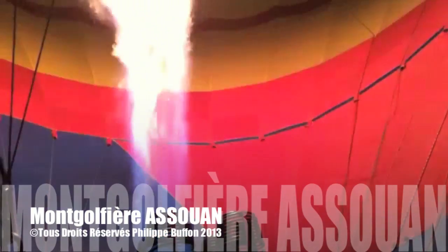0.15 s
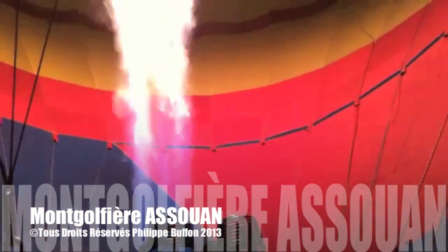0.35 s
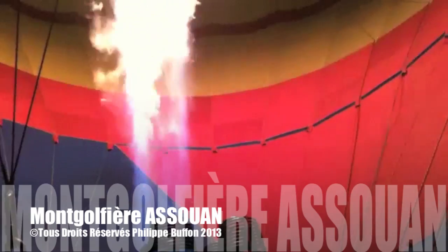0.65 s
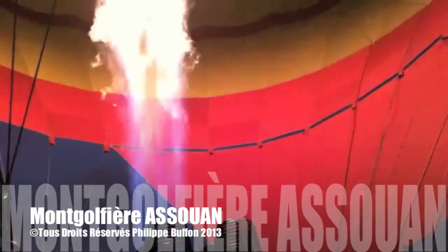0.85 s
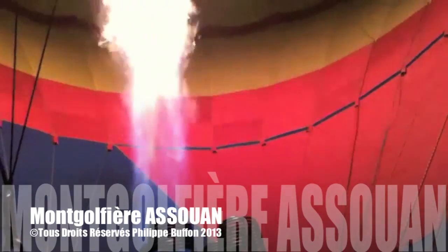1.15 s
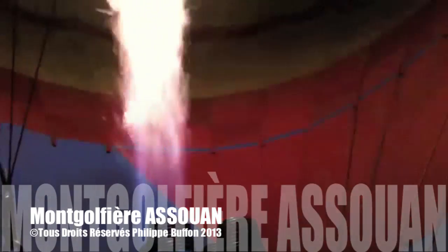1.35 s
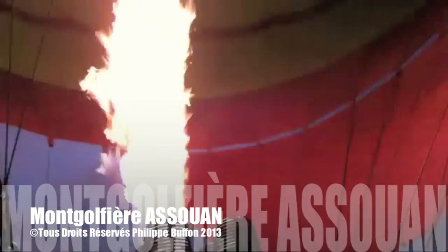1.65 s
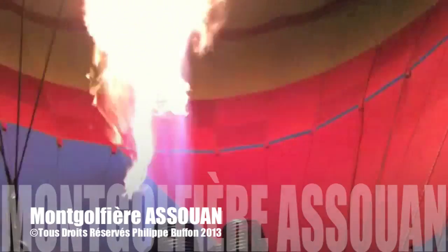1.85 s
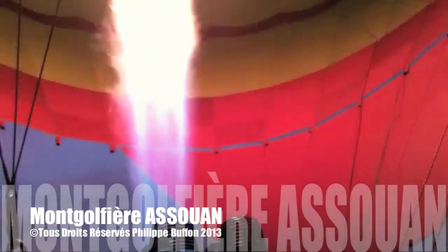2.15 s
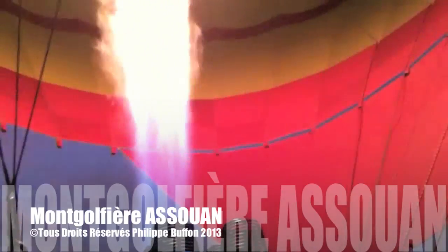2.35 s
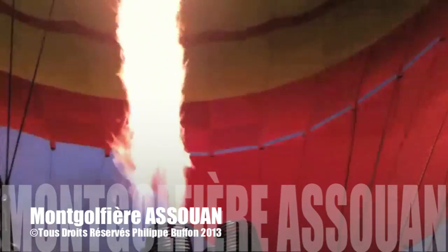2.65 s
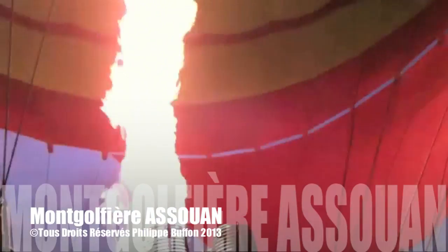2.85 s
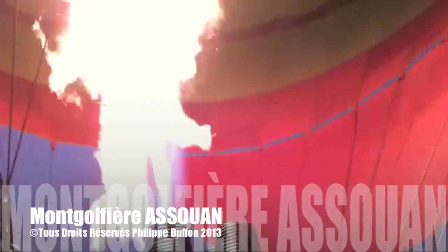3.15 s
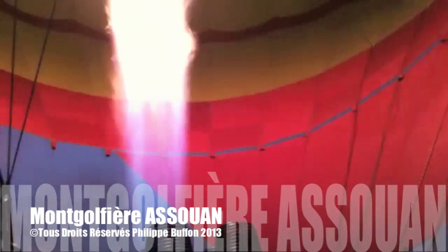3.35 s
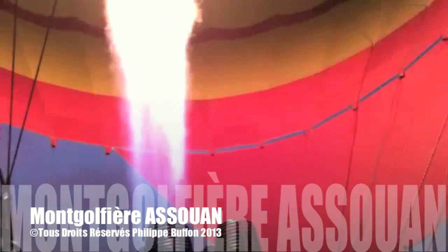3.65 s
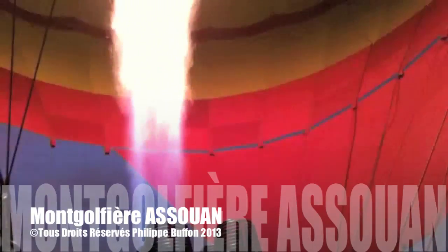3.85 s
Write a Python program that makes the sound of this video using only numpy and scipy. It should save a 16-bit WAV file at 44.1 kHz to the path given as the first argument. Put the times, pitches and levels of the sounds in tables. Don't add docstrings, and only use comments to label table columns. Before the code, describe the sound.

A propane burner roars and hisses loudly in bursts under a balloon envelope, twice dying to a dull faint echo before snapping back on.

```python
import sys
import numpy as np
from scipy import signal
from scipy.fft import rfft, irfft, dct, next_fast_len
from scipy.io import wavfile
from scipy.ndimage import uniform_filter1d

SR = 44100
rng = np.random.default_rng(int(sys.argv[2]) if len(sys.argv) > 2 else 0)


def store_wav(level_fs):
    pcm = np.round(np.clip(np.atleast_2d(level_fs), -1, 1) * 32767)
    wavfile.write(sys.argv[1], SR, pcm.T.astype(np.int16))


def nominal_scale(level):
    x = np.asarray(level, float) / 20
    return 10 ** x


N = 177326
FRAME = 1024

# time_s, level_db
VALVE_FLOW = [(0, -21.5), (.05, -21), (.9, -20.5), (1.2, -24), (1.32, -30), (1.45, -41), (1.708, -56),
              (1.714, -25.5), (2.08, -23), (2.35, -25.5), (2.5, -31.5), (2.6, -43), (2.78, -54),
              (3.014, -55), (3.02, -25), (3.5, -21), (3.75, -26), (4.02, -33)]
# peak_s, level_db, rise_s
GAS_FLARES = [(.42, 2.5, 0.14), (.83, 4, .12), (.95, 2.5, .04), (1.41, 2.5, .03), (1.6, 5, .06),
              (1.885, 3, 0.034), (1.971, 3, .02), (2.039, 3.5, .03), (2.221, 3.5, .02), (2.589, 2.5, .03),
              (2.8, 3, .08), (3.215, 2, 0.023), (3.265, 4, .02), (3.45, 4.5, 0.092), (3.715, 3, 0.044),
              (3.885, 4, .03)]
# pitch_hz, level_db (per Hz)
FLAME_COLOUR = [(35, -62), (76, -31.5), (115, -10), (143, 0.5), (194, -3), (241, -1), (373, -3), (449, -10),
                (638, -6), (1000, -10.5), (1580, -16), (1840, -13), (2550, -13.5), (3050, -22)]
# pitch_hz, level_db (per Hz)
JET_COLOUR = [(1710, -36), (2900, -8.5), (3610, -8.5), (4280, -7), (4690, -11), (6000, -2.5), (6630, 0),
              (8190, -4), (8980, -10), (9710, -3.5), (10300, -2), (11600, -5), (12900, -14.5), (15200, -9),
              (15700, -9.5)]
# pitch_hz, level_db (per Hz)
ECHO_COLOUR = [(35, -60), (70, -35), (140, -4.5), (260, -3), (500, -12.5), (700, -8.5), (1700, -15.5),
               (2500, -20.5), (3150, -25.5), (5250, -19), (8000, -25.5), (10500, -42), (13500, -46),
               (15600, -36)]
LAYER_EDGES_HZ = (20, 450, 3000, 8900, 17000)
# pitch_hz, width_hz, depth_db
HOUSING_DENTS = [(3540, 220, -2.5), (4717, 200, -11), (8900, 280, -5.5), (12540, 130, -2.5),
                 (13800, 270, -2), (14500, 260, -14)]
# middle_s, low_hz, high_hz, level_db
SIDE_BANDS = [(0.04, 6800, 8860, -28.5), (0.456, 14400, 15900, -40), (1.199, 7500, 9300, -33),
              (1.315, 10300, 11800, -37), (2.035, 9600, 11800, -34), (2.198, 8900, 11800, -33),
              (2.29, 12600, 13800, -43), (2.314, 10200, 15200, -36), (2.337, 6230, 7600, -39.5),
              (2.476, 14400, 15900, -42), (3.289, 11000, 12400, -36), (3.707, 14400, 15900, -40.5),
              (3.753, 5170, 6300, -37)]
# block_offset_samples, then a list of pitch_hz, step_db (over the level nearby)
ROUNDING_PASSES = [
    (208, [(300, -26), (2000, -12), (3500, 0), (4700, 3), (7000, -2), (9000, 3), (10500, -1), (12500, 6), (16000, 7)]),
    (106, [(300, -14), (800, -6), (3500, -1), (5000, -2), (7000, -10), (11000, -10), (13000, -4), (16000, -5)]),
    (656, [(300, -28), (800, -14), (2500, -13), (4000, -9), (7000, -14), (11000, -12), (13000, -6), (16000, -7)]),
]

ROAR_LAG_S, BODY_LAG_S, HOSE_LAG_S = 0.018, 0.008, 0.038
FLAME_FULL_DB, FULL_SHARE = -24.5, 0.43
ROAR_DB, ROAR_FOLLOWS = -21.5, 0.82
BODY_DB, BODY_FOLLOWS = -21.5, 0.92
FLARE_FALL_S, FLARE_IN_BODY = 0.012, 0.3
TOP_DB, DULL_UNDER_DB, DULL_SLOPE = -3, -43.5, 0.99
ECHO_ONLY_DB, DIRECT_ONLY_DB = -54, -40
TOP_HZ, SMALLEST_STEP_DB = 15740, -65.5


def rms_one(x):
    return x / np.sqrt(np.mean(x ** 2) + 1e-20)


def in_time(rows):
    s, *columns = np.transpose(rows)
    return [np.interp(np.arange(N) / SR, s, column) for column in columns]


def at_hz(points, hz):
    points_hz, points_db = np.transpose(points)
    return np.interp(np.log(hz), np.log(points_hz), points_db)


def drift(rate_hz):
    r = np.exp(-2 * np.pi * rate_hz * 40 / SR)
    noise = rng.standard_normal(N // 40 + 2002)
    slow = signal.lfilter([1], [1, -2 * r, r * r], noise)[2000:]
    return np.interp(np.arange(N) / 40, np.arange(len(slow)), rms_one(slow))


def coloured(spectrum):
    size = next_fast_len(N)
    hz = np.arange(1, size // 2 + 2) * SR / size
    return hz, rfft(rng.standard_normal(size)) * nominal_scale(at_hz(spectrum, hz))


def turbulence(spectrum, low_hz, high_hz, shared_db, patchy_db, rate_hz):
    hz, noise = coloured(spectrum)
    place = 4 * np.log(hz / low_hz) / np.log(high_hz / low_hz)
    inside = (place >= 0) * (place < 4)
    out = 0
    for k in range(5):
        share = np.clip(1 - np.abs(place - k), 0, 1) * inside
        band = irfft(noise * share, next_fast_len(N))[:N]
        out = out + nominal_scale(patchy_db * drift(rate_hz)) * band
    return rms_one(out * nominal_scale(shared_db))


def lagged(db, lag_s):
    r = np.exp(-1 / (lag_s * SR))
    gain = signal.lfilter([1 - r], [1, -r], nominal_scale(db), zi=[r * nominal_scale(db[0])])[0]
    return 20 * np.log10(gain)


def flame_db(jet_db, lag_s, level_db, follows):
    over_db = lagged(jet_db, lag_s) - FLAME_FULL_DB
    return level_db + follows * np.minimum(over_db, 0) + FULL_SHARE * np.maximum(over_db, 0)


def gas_flares():
    t = np.arange(N) / SR
    flare_db = 0
    for peak_s, level_db, rise_s in GAS_FLARES:
        flare_db = flare_db + level_db * np.exp(np.minimum((t - peak_s) / rise_s, (peak_s - t) / FLARE_FALL_S))
    return flare_db


def layer_levels():
    valve_db = in_time(VALVE_FLOW)[0]
    jet_db = lagged(lagged(valve_db, HOSE_LAG_S), HOSE_LAG_S)
    flare_db = gas_flares()
    roar_db = flame_db(jet_db, ROAR_LAG_S, ROAR_DB, ROAR_FOLLOWS) + flare_db
    body_db = flame_db(jet_db, BODY_LAG_S, BODY_DB, BODY_FOLLOWS) + FLARE_IN_BODY * flare_db
    top_db = jet_db + TOP_DB + DULL_SLOPE * np.minimum(jet_db - DULL_UNDER_DB, 0)
    return [roar_db, body_db, jet_db, top_db]


def flame_roar(flutter):
    low, middle, high = LAYER_EDGES_HZ[:3]
    roar = turbulence(FLAME_COLOUR, low, middle, shared_db=0.42 * flutter, patchy_db=0.5, rate_hz=12)
    body = turbulence(FLAME_COLOUR, middle, high, shared_db=0.33 * flutter, patchy_db=0.53, rate_hz=14)
    return [roar, body]


def jet_hiss(flutter):
    low, middle, high = LAYER_EDGES_HZ[2:]
    hiss = turbulence(JET_COLOUR, low, middle, shared_db=0.34 * flutter, patchy_db=0.5, rate_hz=12)
    top = turbulence(JET_COLOUR, middle, high, shared_db=0.27 * flutter, patchy_db=0.5, rate_hz=11)
    return [hiss, top]


def housing(x):
    out = x.copy()
    for hz, width_hz, depth_db in HOUSING_DENTS:
        k = np.tan(np.pi * width_hz / SR)
        floor = k * nominal_scale(depth_db)
        wander = 1 + 0.016 * drift(4)
        state = np.zeros(2)
        for i in range(0, N, FRAME):
            w = -2 * np.cos(2 * np.pi * hz * wander[i] / SR)
            block = out[i:i + FRAME]
            out[i:i + FRAME], state = signal.lfilter([1 + floor, w, 1 - floor], [1 + k, w, 1 - k], block, zi=state)
    return out


def envelope_echo():
    hz, echo = coloured(ECHO_COLOUR)
    layers = []
    for low_hz, high_hz in zip(LAYER_EDGES_HZ, LAYER_EDGES_HZ[1:]):
        band = echo * (hz >= low_hz) * (hz < high_hz)
        layers.append(rms_one(irfft(band, next_fast_len(N))[:N]))
    return layers


def burner():
    levels_db = layer_levels()
    jet_db = levels_db[2]
    direct_share = np.clip((jet_db - ECHO_ONLY_DB) / (DIRECT_ONLY_DB - ECHO_ONLY_DB), 0, 1)
    flutter = drift(11)
    near_layers = flame_roar(flutter) + jet_hiss(flutter)
    near = sum(nominal_scale(db) * layer for db, layer in zip(levels_db, near_layers))
    far = sum(nominal_scale(db) * layer for db, layer in zip(levels_db, envelope_echo()))
    return housing(np.sqrt(direct_share) * near) + np.sqrt(1 - direct_share) * far


def scene():
    return burner() * np.ones((2, 1))


def side_bands():
    side = np.zeros(N + 2 * FRAME)
    window = signal.windows.kaiser_bessel_derived(2 * FRAME, beta=4 * np.pi)
    hz = np.arange(FRAME + 1) * SR / (2 * FRAME)
    for middle_s, low_hz, high_hz, level_db in SIDE_BANDS:
        white = rng.standard_normal(2 * FRAME)
        band = rms_one(irfft(rfft(white) * (hz > low_hz) * (hz < high_hz)))
        start = round(middle_s * SR) - FRAME
        side[start:start + 2 * FRAME] += nominal_scale(level_db) * band * window
    return side[:N] * [[1], [-1]]


def rounded(x, offset, steps, window):
    padded = np.pad(x, (2 * FRAME - offset, 3 * FRAME))
    blocks = padded[:len(padded) // FRAME * FRAME].reshape(-1, FRAME)
    a, b, c, d = np.split(np.hstack([blocks[:-1], blocks[1:]]) * window, 4, axis=1)
    lines = dct(np.hstack([-c[:, ::-1] - d, a - b[:, ::-1]]), type=4, norm="ortho")
    nearby = np.sqrt(uniform_filter1d(lines ** 2, size=80, axis=1) + 1e-16)
    chance = rng.standard_normal((len(lines), FRAME // 32))
    scatter_db = 4 * uniform_filter1d(chance, size=3, axis=0).repeat(32, axis=1)
    band = np.arange(FRAME) // 32 * 32 + 16
    step_db = at_hz(steps, band * SR / 2 / FRAME) + scatter_db
    step = nearby[:, band] * nominal_scale(step_db) + nominal_scale(SMALLEST_STEP_DB)
    whole = np.floor(np.abs(lines / step) ** 0.75 + 0.4054)
    lines = np.sign(lines) * step * whole ** (4 / 3)
    lines[:, round(TOP_HZ * 2 * FRAME / SR):] = 0
    u, v = np.split(dct(lines, type=4, norm="ortho"), 2, axis=1)
    frames = np.hstack([v, -v[:, ::-1], -u[:, ::-1], -u]) * window
    return (frames[1:, :FRAME] + frames[:-1, FRAME:]).ravel()[FRAME - offset:][:N]


def band_limit(x):
    return signal.sosfilt(signal.butter(12, 15900, fs=SR, output="sos"), x)


def record(dry):
    sine = np.sin(np.pi * (np.arange(2 * FRAME) + 0.5) / (2 * FRAME))
    steep = signal.windows.kaiser_bessel_derived(2 * FRAME, beta=4 * np.pi)
    mono = dry[0]
    for (offset, steps), window in zip(ROUNDING_PASSES, (sine, sine, steep)):
        mono = rounded(mono, offset, steps, window)
    mix = mono + side_bands()
    return band_limit(mix)


dry = scene()
out = record(dry)
store_wav(out)
```